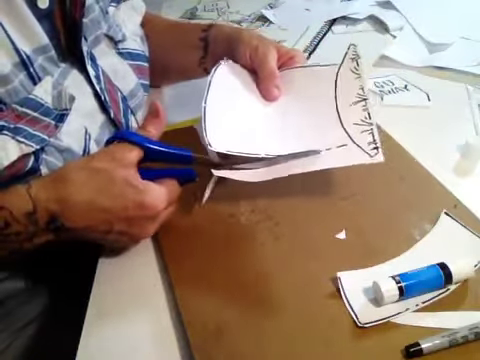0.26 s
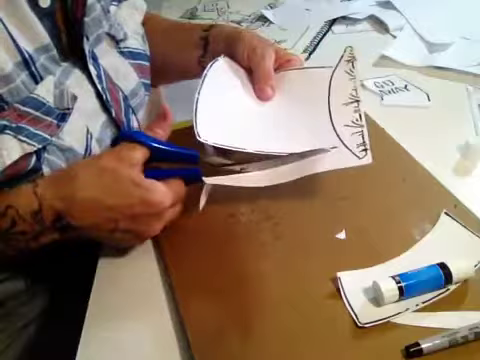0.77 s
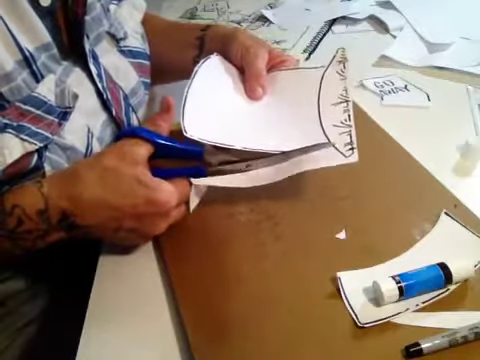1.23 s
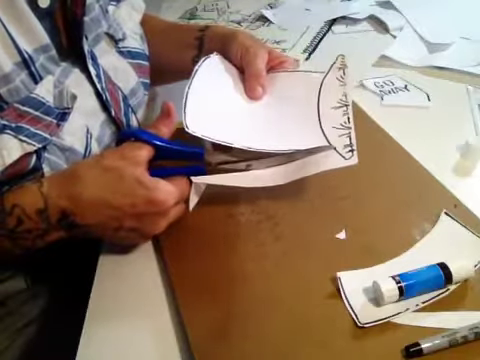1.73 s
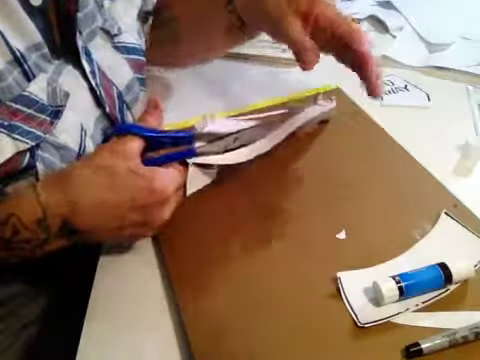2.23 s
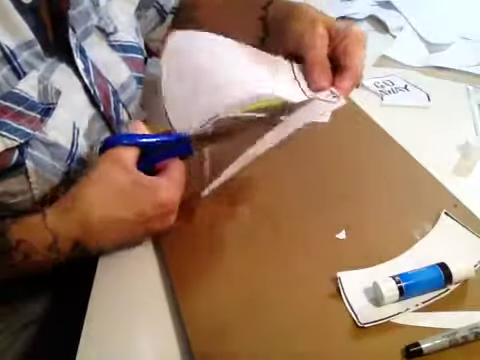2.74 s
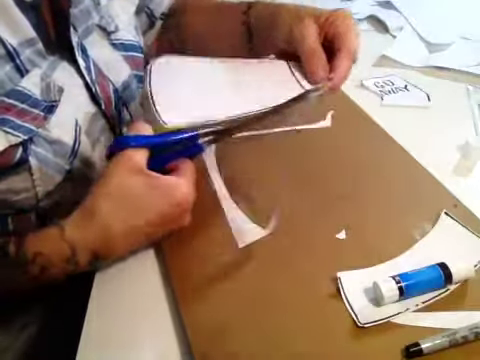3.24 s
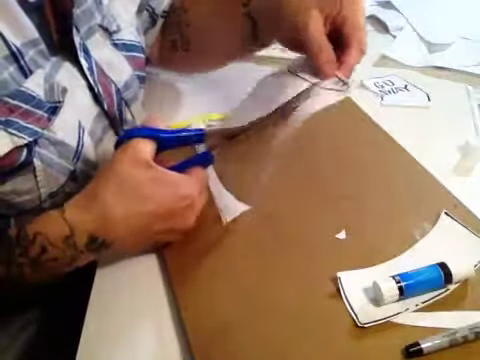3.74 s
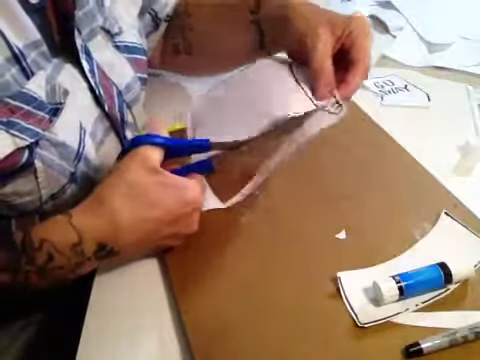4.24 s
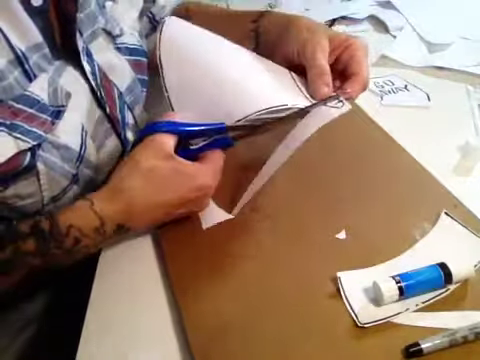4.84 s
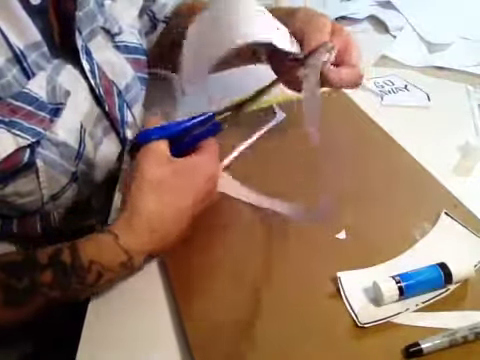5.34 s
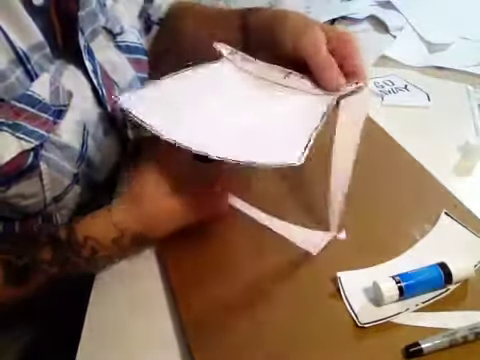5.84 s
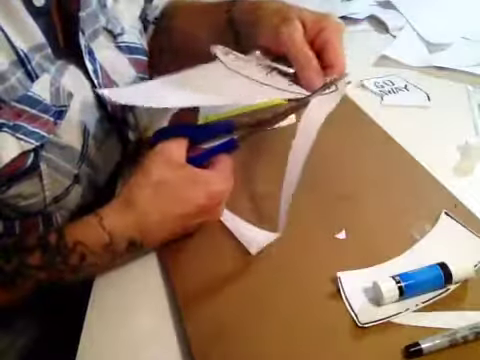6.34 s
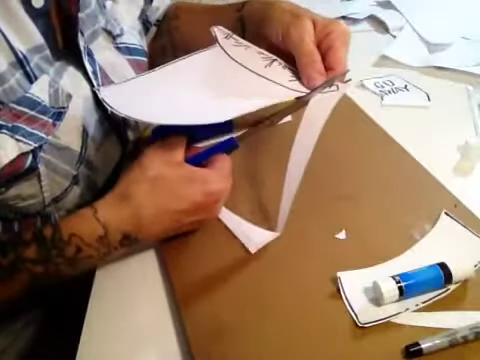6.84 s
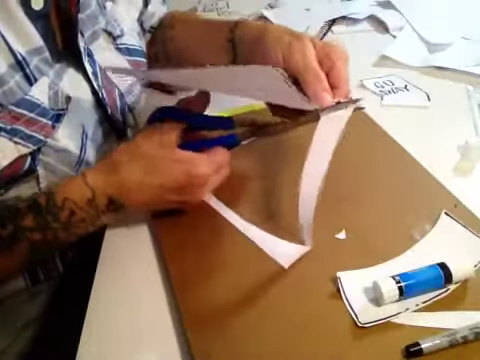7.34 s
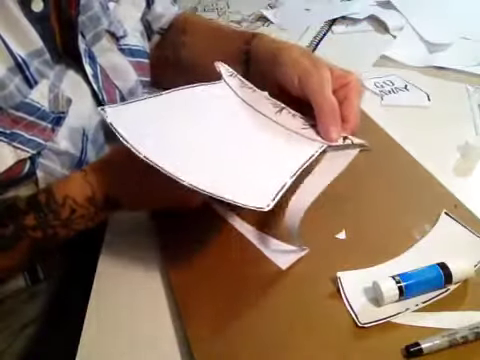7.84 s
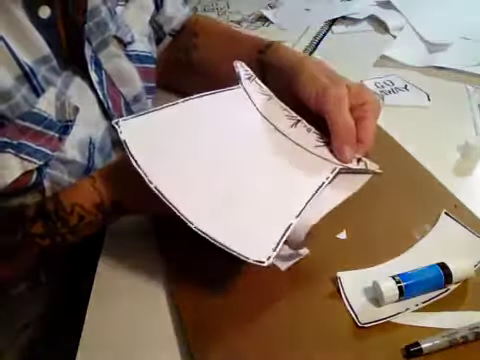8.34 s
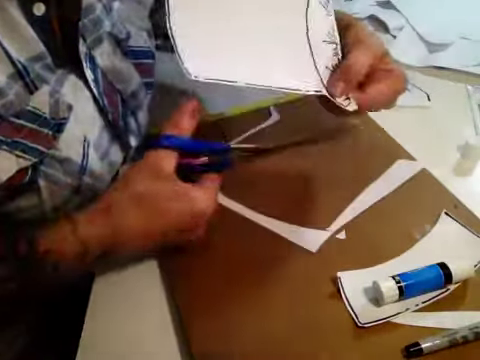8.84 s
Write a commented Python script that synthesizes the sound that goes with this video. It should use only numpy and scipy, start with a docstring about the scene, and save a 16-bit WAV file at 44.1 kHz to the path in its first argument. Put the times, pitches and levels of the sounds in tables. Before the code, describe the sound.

A close, small microphone indoors hears scissors working through stiff paper over a quiet low fan hum and soft hiss. From 0 to 2 seconds there are soft, uneven snips and rustles with tiny snaps, short gaps between them, and a faint steely ring around 1.6 to 1.9. At about 2.04 a single dull knock lands, followed by a swelling shear. Around 2.4 to 2.55 the sheet rattles and snaps sharply. From 2.7 to 4.5 softer, longer crackling strokes overlap; from 4.5 to 5.6 they grow stronger and brighter. Between 5.5 and 5.9 comes the fullest shearing and a loud papery rattle. It fades to near quiet by 6.4. Small ticks return at 6.7, thin scrapes and bright clicks cluster at 7.2 to 7.6, then light brushing builds from 8.1 to a crisp snap at 8.55. Quiet follows, with a last faint tick near 9.05. Echoes are short.

```python
"""A bright crackle of shearing fibres comes first: scissors work round a stiff sheet held close to a small microphone.
One rhythm of noise bursts, swelling with each stroke, drives the cut edge, the rustling sheet and faint blade tones.
Snaps are short noise cracks that ring a note of the sheet; one dull knock is a pulse and a low decaying sine.
A fan hums low in the room as narrow noise bands over hiss; sparse decaying echoes follow the close sounds."""
import sys
import numpy as np
from scipy import signal
from scipy.fft import rfft, irfft
from scipy.io import wavfile
from scipy.ndimage import uniform_filter1d

SR = 44100
rng = np.random.default_rng(int(sys.argv[2]) if len(sys.argv) > 2 else 0)


def boost(x):
    """Linear amplitude factor 10**(x/20) for a level x in decibels (scalar or array-like)."""
    u = np.asarray(x, float) / 20
    return 10 ** u


def to_wav(s):
    """Save 16-bit WAV."""
    ch = np.atleast_2d(s).T  # columns
    pcm = np.round(np.clip(ch, -1, 1) * 32767)  # PCM
    wavfile.write(sys.argv[1], SR, pcm.astype(np.int16))


N = 401310

# Snaps of the sheet: start_s, crack_db (peak drive before colouring), note_hz,
# note_db (rms over its first 10 ms), t60_s (decay of the burst)
SNAP_EVENTS = [(0.0646, -34, 2370, -54, 0.014), (0.1955, -41, 2120, -51, 0.015),
               (0.3234, -59, 1280, -53.5, 0.041), (0.691, -30.5, 2110, -65, 0.011),
               (0.8821, -35, 2440, -56, 0.0093), (1.0382, -32, 2230, -58, 0.011),
               (1.372, -33, 2160, -54, 0.008), (1.5706, -40, 2190, -58, 0.014),
               (2.0368, -31, 4300, -45, 0.0068), (2.4262, -34.5, 2060, -56, 0.022),
               (2.4428, -31, 3060, -58, 0.011), (2.464, -24.5, 2900, -37.5, 0.025),
               (2.4737, -32, 3230, -36, 0.022), (2.5224, -29, 1500, -38.5, 0.0055),
               (2.535, -39, 1170, -49, 0.03), (3.1778, -38, 1460, -53, 0.012),
               (3.2485, -39, 557, -52, 0.0081), (3.3484, -51.5, 550, -52, 0.012),
               (3.4998, -49, 557, -53, 0.02), (3.5323, -35.5, 3220, -54.5, 0.012),
               (3.737, -36, 2160, -54, 0.0091), (3.7661, -33, 2160, -45, 0.009),
               (3.779, -47, 1310, -50, 0.0092), (3.9672, -45, 1600, -61, 0.008),
               (4.0045, -38, 4120, -68, 0.0087), (4.2298, -39.5, 549, -66, 0.01),
               (4.3325, -40, 1360, -56, 0.012), (4.568, -33.5, 3460, -61, 0.01),
               (5.1796, -25, 2270, -48.5, 0.011), (5.2963, -34, 3900, -52, 0.018),
               (5.6549, -25.5, 4200, -45, 0.015), (5.7146, -30, 1400, -41.5, 0.015),
               (5.7155, -28, 3300, -40, 0.0088), (5.7885, -30, 3970, -51, 0.016),
               (5.8418, -42, 1850, -37.5, 0.011), (6.67, -46, 520, -68, 0.01),
               (6.7095, -55, 2070, -46.5, 0.02), (6.753, -37, 563, -60, 0.012),
               (7.011, -43, 1140, -56.5, 0.016), (7.208, -27, 3670, -56, 0.0066),
               (7.341, -32.5, 614, -61, 0.0083), (7.3812, -29.5, 2270, -57, 0.0098),
               (7.3948, -23, 3700, -54, 0.011), (7.408, -32, 4380, -63, 0.0071),
               (7.447, -26.5, 2310, -62, 0.01), (7.451, -41, 2300, -61, 0.014),
               (7.4715, -33, 1500, -73, 0.01), (7.5335, -22, 3950, -57, 0.0065),
               (7.587, -32, 4460, -54, 0.012), (7.5912, -27, 4180, -57, 0.011),
               (7.5964, -33, 3920, -62, 0.014), (7.7522, -40, 452, -70, 0.011),
               (7.9373, -45, 662, -78, 0.012), (7.9934, -35, 783, -72, 0.0078),
               (8.1307, -29.5, 3720, -52.5, 0.0098), (8.2328, -41, 3500, -54, 0.015),
               (8.2605, -37.5, 4420, -62, 0.015), (8.46, -38, 2510, -60, 0.012),
               (8.52, -34, 2580, -55, 0.0077), (8.535, -29, 3070, -47.5, 0.0097),
               (8.55, -14.5, 3700, -54, 0.0071), (9.0307, -34, 463, -62, 0.0065),
               (9.0451, -29, 4630, -49.5, 0.014), (9.0668, -36, 3730, -59, 0.012)]
# Colour of tearing fibres: frequency_hz, relative level_db (per Hz)
SHEAR_COLOUR = [(1200, -25), (2500, -3), (3800, 2.5), (6000, 3.5), (8500, 4.5), (10500, 5), (13000, 7),
                (15000, 5)]


def evened(x):
    """Scales to an rms of one."""
    return x / np.sqrt(np.mean(x ** 2) + 1e-20)


def read(points, hz):
    """Joins (Hz, value) points on a log frequency axis."""
    f, value = np.transpose(points)
    return np.interp(np.log(hz + 1), np.log(f + 1), value)


def curve(times_s, values):
    """Joins timed points into a straight-lined curve, one value per sample."""
    return np.interp(np.arange(N) / SR, times_s, values)


def add(mix, start_s, sound):
    """Mixes a sound in at a time."""
    part = mix[round(start_s * SR):][:len(sound)]
    part += sound[:len(part)]


def coloured(x, points):
    """Causal minimum-phase filter with the given spectrum that keeps the power of white noise."""
    level_db = read(points, abs(np.fft.fftfreq(8192, 1 / SR)))
    log_gain = np.log(boost(level_db))
    taps = np.fft.ifft(np.exp(np.conj(signal.hilbert(log_gain)))).real[:4096]
    return signal.oaconvolve(x, taps / np.linalg.norm(taps))[:N]


def resonate(x, hz, width_hz):
    """One decaying resonance that keeps the power of white noise."""
    t = np.arange(int(3 * SR / width_hz)) / SR
    taps = np.exp(-np.pi * width_hz * t) * np.sin(2 * np.pi * hz * t)
    return signal.oaconvolve(x, taps / np.linalg.norm(taps))[:N]


def gliding(x, hz, width_hz):
    """A resonance of gain one that follows a pitch curve: shift down, smooth, shift back."""
    turn = np.exp(2j * np.pi * np.cumsum(hz) / SR)
    r = np.exp(-np.pi * width_hz / SR)
    return 2 * (turn * signal.lfilter([1 - r], [1, -r], x / turn)).real


def strokes():
    """Overlapping strokes add their power; the balance of shear and rustle sets the bent sheet's pitch."""
    # Blade strokes and turns of the sheet: start_s, rise_s, fade_s, shear_db, rustle_db (drive at the top)
    stroke_events = [(0.0, 0.087, 0.024, -49, -50.5), (0.006, 0.01, 0.064, -51.5, -50.5),
                     (0.061, 0.077, 0.14, -50.5, -51.5), (0.184, 0.011, 0.021, -45.5, -45.5),
                     (0.286, 0.046, 0.014, -65, -53.5), (0.308, 0.07, 0.19, -48.5, -51.5),
                     (0.363, 0.11, 0.091, -56, -49), (0.673, 0.015, 0.19, -49.5, -46.5),
                     (0.715, 0.034, 0.087, -58, -51.5), (0.877, 0.004, 0.057, -54, -54),
                     (1.019, 0.015, 0.24, -50.5, -53.5), (1.068, 0.0025, 0.022, -44.5, -73.5),
                     (1.302, 0.077, 0.13, -52, -50), (1.318, 0.015, 0.05, -50, -55.5),
                     (1.365, 0.014, 0.018, -53, -48.5), (1.398, 0.011, 0.016, -45.5, -49.0),
                     (1.481, 0.0044, 0.044, -49.5, -53), (1.525, 0.014, 0.037, -52.0, -51),
                     (1.558, 0.013, 0.034, -49, -49), (1.634, 0.032, 0.031, -50, -52.5),
                     (1.657, 0.096, 0.052, -51.5, -55), (1.751, 0.013, 0.016, -54, -48),
                     (1.869, 0.088, 0.071, -53.5, -58.5), (1.992, 0.043, 0.051, -65, -51.5),
                     (2.026, 0.031, 0.18, -47.5, -51.5), (2.033, 0.004, 0.015, -59, -40.5),
                     (2.142, 0.12, 0.19, -46, -53.5), (2.415, 0.043, 0.12, -39, -47.5),
                     (2.42, 0.0051, 0.038, -45, -50.0), (2.454, 0.009, 0.044, -78.5, -33.5),
                     (2.489, 0.037, 0.035, -39, -39), (2.511, 0.005, 0.3, -54.0, -48.5),
                     (2.637, 0.048, 0.099, -52.0, -75.0), (2.743, 0.1, 0.22, -59.5, -56.5),
                     (2.852, 0.143, 0.095, -55.0, -59.5), (2.974, 0.25, 0.14, -53, -53.5),
                     (3.014, 0.047, 0.094, -54, -57.5), (3.199, 0.19, 0.45, -51.0, -60),
                     (3.302, 0.05, 0.056, -76.5, -47), (3.34, 0.17, 0.19, -53, -51.5),
                     (3.623, 0.021, 0.13, -49.5, -64), (3.625, 0.29, 0.054, -51.5, -55.0),
                     (3.704, 0.039, 0.16, -51, -52.5), (3.758, 0.0065, 0.074, -77.0, -45),
                     (3.901, 0.1, 0.052, -52.0, -60.0), (4.016, 0.045, 0.19, -48.5, -54.5),
                     (4.087, 0.28, 0.065, -50.0, -59.5), (4.32, 0.17, 0.1, -49, -54.0),
                     (4.325, 0.0082, 0.039, -55, -54.5), (4.34, 0.038, 0.05, -57.5, -52.0),
                     (4.517, 0.059, 0.075, -47, -56.5), (4.56, 0.19, 0.14, -43, -49.5),
                     (4.74, 0.11, 0.09, -44, -51.5), (4.9, 0.06, 0.18, -60.5, -61.5),
                     (4.973, 0.18, 0.21, -42, -51), (5.079, 0.037, 0.04, -40.0, -53),
                     (5.173, 0.005, 0.037, -46.5, -47.0), (5.269, 0.024, 0.28, -44.5, -52),
                     (5.294, 0.014, 0.022, -41.5, -47), (5.38, 0.076, 0.036, -46, -64.5),
                     (5.5, 0.039, 0.21, -46.5, -57.5), (5.508, 0.24, 0.038, -37, -50.0),
                     (5.641, 0.0099, 0.05, -46.0, -48.5), (5.686, 0.027, 0.039, -38, -40.5),
                     (5.745, 0.051, 0.238, -41.0, -49), (5.794, 0.16, 0.068, -52.0, -52.5),
                     (5.831, 0.01, 0.06, -40.5, -33), (5.97, 0.06, 0.14, -64, -60.0),
                     (6.085, 0.097, 0.26, -52.5, -60.5), (6.112, 0.31, 0.072, -54.5, -57.5),
                     (6.652, 0.019, 0.033, -65.0, -70), (6.705, 0.003, 0.059, -74, -56),
                     (6.748, 0.011, 0.025, -47, -53), (6.751, 0.002, 0.14, -59, -64),
                     (6.979, 0.064, 0.043, -45.5, -51.5), (7.06, 0.03, 0.067, -59, -66.0),
                     (7.125, 0.012, 0.2, -53.0, -61), (7.131, 0.62, 0.065, -59.5, -71.5),
                     (7.243, 0.17, 0.13, -48, -57), (7.442, 0.002, 0.02, -39, -65),
                     (7.528, 0.007, 0.058, -54, -71), (7.563, 0.021, 0.1, -47.5, -58.5),
                     (7.927, 0.01, 0.034, -57, -74), (7.974, 0.023, 0.11, -59.5, -75),
                     (8.105, 0.025, 0.046, -53.5, -67), (8.139, 0.054, 0.038, -56.5, -64),
                     (8.21, 0.026, 0.067, -53, -65.0), (8.293, 0.018, 0.043, -53, -61),
                     (8.362, 0.034, 0.059, -52, -67), (8.428, 0.13, 0.11, -45.5, -56),
                     (8.449, 0.016, 0.08, -50.5, -60.0), (8.522, 0.17, 0.13, -44.5, -51),
                     (9.011, 0.031, 0.013, -62, -61.5), (9.042, 0.002, 0.098, -55.5, -63.0)]
    held_db, quick_s = -7, 0.045
    power = np.full((2, N), 1e-10)
    for start_s, rise_s, fade_s, shear_db, rustle_db in stroke_events:
        t = np.arange(0, rise_s + 2 * fade_s, 1 / SR)
        swell = np.minimum(t / rise_s, 1) ** 2
        # Past the top it sinks ever faster, by 23 dB in its fade time.
        sink = boost(-23 * (np.maximum(t - rise_s, 0) / fade_s) ** 2)
        shape = swell * sink
        # A quick stroke is held back until a snap frees it.
        waits = [snap[0] - start_s for snap in SNAP_EVENTS]
        freed = [wait for wait in waits if 0 < wait < rise_s + 0.003 < quick_s]
        shape = np.where(t < max(freed, default=0), boost(held_db) * shape, shape)
        add(power[0], start_s, (boost(shear_db) * shape) ** 2)
        add(power[1], start_s, (boost(rustle_db) * shape) ** 2)
    shear_db, rustle_db = 10 * np.log10(power)
    # The tighter the sheet, the brighter it shears and the higher it rings: 0.12 octaves per dB.
    tight = 2 ** (0.12 * uniform_filter1d(shear_db - rustle_db, size=441))
    bend_hz = np.clip(1500 * tight, 700, 2900)
    return shear_db, rustle_db, bend_hz


def fibres(per_s, spread_db, smooth, clump_db):
    """Breaking fibres: tiny bursts of uneven size that come in clumps, over a smooth rub."""
    size = boost(spread_db * np.minimum(rng.exponential(1, N), 4))
    breaks = size * (rng.random(N) < per_s / SR)
    bursts = evened(signal.lfilter([1], [1, -np.exp(-1 / (0.00024 * SR))], breaks))  # 0.24 ms decay
    clumps = evened(signal.lfilter(np.hanning(500), 1, rng.standard_normal(N)))
    rhythm = evened((smooth + bursts) * boost(clump_db * clumps))
    return rhythm * rng.standard_normal((4, N))  # four parts share the rhythm, each with its own noise


def facing(x):
    """The top treble beams from the edge, the lower crackle from the loose sheet; both swing as it turns."""
    # The turning sheet: time_s, top_db (lift as the edge faces the microphone), full_db (loose paper's body)
    turning = [(0, 4.5, -0.5), (.8, -0.5, -0.5), (1.5, -3, -3), (2.2, 0.5, -1), (2.7, -5, 1.5),
               (3.402, -0.5, 0.5), (4.2, 0, -1), (5.2, -2, 1), (6.1, -1, 1), (6.8, 3, -2), (7.3, -1, -7),
               (7.8, 6.5, -6), (8.3, 4.5, 1), (9.1, 3.5, -1)]
    time_s, top_db, full_db = np.transpose(turning)
    for kind, hz, lift_db in (("high", 10500, top_db), ("low", 5000, full_db)):
        part = signal.filtfilt(*signal.butter(2, hz, kind, fs=SR), x)
        x = x + (boost(curve(time_s, lift_db)) - 1) * part
    return x


def cut_edge(at_edge, shear_db):
    """Shearing fibres radiate a bright crackle from the cut edge."""
    return facing(coloured(boost(shear_db) * at_edge, SHEAR_COLOUR))


def sheet(flat_drive, bend_drive, bend_hz):
    """The paper rustles as a broad flat surface and through one wide resonance that moves as it bends."""
    # Colour of the rustling paper: frequency_hz, relative level_db (per Hz)
    sheet_colour = [(150, -18.5), (350, -4), (700, 2.5), (980, -4.5), (1180, 2.5), (1400, 0.5), (2200, -2),
                    (3300, -1.5), (5000, -6), (9000, -15)]
    flat = 0.67 * coloured(flat_drive, sheet_colour)
    bent = 0.69 * gliding(coloured(bend_drive, sheet_colour), bend_hz, width_hz=1750)
    return flat + bent


def blades(drive):
    """Steel resonances ring under the fibres and drift with the point of contact."""
    # Blade resonances: pitch_hz, width_hz, relative level_db
    blade_modes = [(1193, 53, -11), (2173, 220, 1), (2750, 150, -9.5), (3670, 98, -16), (7900, 500, -7),
                   (10700, 300, -21), (13700, 830, -3)]
    wander = evened(signal.oaconvolve(rng.standard_normal(N), np.hanning(6000), "same"))
    drift = 1 + 0.02 * wander
    steel = np.zeros(N)
    for hz, width_hz, level_db in blade_modes:
        even_width = np.sqrt(SR / (2 * np.pi * width_hz))  # narrow and wide modes pass like power
        steel += boost(level_db) * even_width * gliding(drive, hz * drift, width_hz)
    return steel


def creased(x, patchy_db):
    """As the paper bends, patches of its spectrum swell and fade at random."""
    z = signal.stft(x, nperseg=512, noverlap=384)[2]
    patches = rng.standard_normal(z.shape[::-1]).T
    patches = uniform_filter1d(patches, size=14, axis=0)  # spread over frequency
    patches = evened(uniform_filter1d(patches, size=12, axis=1))  # and over time
    return signal.istft(z * boost(patchy_db * patches), nperseg=512, noverlap=384)[1][:N]


def cutting():
    """The same rhythm of breaking fibres drives the cut edge, the sheet and the blades."""
    # How much the blades ring: time_s, bite_db (drive against the rustle)
    blade_bite = [(0, 4), (.3, -3), (.5, -7), (.66, -3), (.75, 5.5), (.9, 3), (1.1, -3.5), (1.4, 1),
                  (1.6, 8), (1.8, 16), (2.0, -12), (9.1, -9.5)]
    shear_db, rustle_db, bend_hz = strokes()
    at_edge, in_sheet, in_bend, in_steel = fibres(per_s=1100, spread_db=3.5, smooth=5.2, clump_db=1.45)
    bite = boost(curve(*np.transpose(blade_bite)))
    free = boost(rustle_db) / np.sqrt(1 + bite ** 2)  # gripped by the blades, the sheet rustles less
    paper = cut_edge(at_edge, shear_db) + sheet(free * in_sheet, free * in_bend, bend_hz)
    near = creased(paper, patchy_db=1.85) + snaps() + blades(free * bite * in_steel)
    return signal.lfilter(*signal.butter(2, 260, "high", fs=SR), near)  # small things radiate no bass


def background():
    """Rumble and hiss as coloured noise, with the narrow wavering bands of a fan."""
    # Fan bands: pitch_hz, width_hz, level_db (rms)
    fan_bands = [(181.6, 6.8, -61.5), (216.1, 4, -63.5), (299.3, 14, -69.5)]
    # Colour of rumble and hiss: frequency_hz, relative level_db (per Hz)
    air_colour = [(60, -42), (100, -27.5), (150, -14.5), (260, -10), (400, -15.5), (700, -22.5),
                  (1300, -29), (3000, -32), (7000, -31.5), (12000, -33.5), (15000, -32)]
    hum = np.zeros(N)
    for hz, width_hz, level_db in fan_bands:
        hum += boost(level_db) * evened(resonate(rng.standard_normal(N), hz, width_hz))
    return hum + boost(-60) * coloured(rng.standard_normal(N), air_colour)


def room(x):
    """Sparse echoes of random sign, each frequency band dying at its own speed."""
    # Decay of the room: frequency_hz, t60_s
    room_decay = [(300, .2), (1500, .16), (6000, .12), (14000, .09)]
    taps = np.zeros(SR // 2)
    slots = np.arange(120, len(taps) - 20, 20)  # one echo at random in every 20 samples
    taps[slots + rng.integers(0, 20, len(slots))] = rng.choice([-1., 1.], len(slots))
    hz, t, z = signal.stft(taps, SR, nperseg=256)
    decay = boost(-60 * t / read(room_decay, hz)[:, None])
    tail = signal.istft(z * decay, SR, nperseg=256)[1]
    return signal.oaconvolve(x, tail / np.linalg.norm(tail))[:N]


def snaps():
    """Each snap is a bright crack that dies fast and a few cycles of the sheet's note."""
    cracks, notes, t = np.zeros(N), np.zeros(N), np.arange(2000) / SR
    jolts = rng.standard_normal((len(SNAP_EVENTS), len(t)))
    for (start_s, crack_db, hz, note_db, t60_s), jolt in zip(SNAP_EVENTS, jolts):
        onset = 1 - np.exp(-t / 0.00017)
        burst = np.tanh(2 * jolt) * onset * boost(-60 * t / max(t60_s, 0.003))
        tones = np.sin(2 * np.pi * hz * t) + 0.4 * np.sin(2 * np.pi * 1.8 * hz * t)  # note and overtone
        ring = np.exp(-np.pi * (200 + 0.15 * hz) * t) * tones  # higher notes are damped faster
        note = signal.fftconvolve(burst, ring)[:len(t)]
        add(cracks, start_s, boost(crack_db) * burst)
        add(notes, start_s, boost(note_db) * note / note[:SR // 100].std())
    return coloured(cracks, SHEAR_COLOUR) + notes


def knock():
    """One blunt knock: a sharp short push, and barely two cycles of a low ring."""
    start_s, tick_db, tick_s = 2.0368, -22.5, 0.00014
    ring_db, ring_hz, ring_t60_s = -20.5, 470, 0.012
    t, out = np.arange(2000) / SR, np.zeros(N)
    tick = boost(tick_db) * np.e * t / tick_s * np.exp(-t / tick_s)
    ring = boost(ring_db - 60 * t / ring_t60_s) * np.sin(2 * np.pi * ring_hz * t)
    add(out, start_s, tick - ring)
    return out


def scene():
    """Scissors and paper, their echo 10 dB down, and the room's own sound."""
    near = cutting() + knock()
    return (near + boost(-10) * room(near) + background())[None]


def top_cut(x):
    """Nothing passes above the cut-off."""
    return signal.sosfilt(signal.butter(12, 16340, fs=SR, output="sos"), x)


def record(dry):
    """Limits the band: little deep bass is left, and the treble is cut steeply above 15 kHz."""
    # Band limit of the finished mix: frequency_hz, gain_db
    band_limit = [(25, -22), (45, -20), (80, 0), (14950, 0), (15150, -40)]
    hz = np.fft.rfftfreq(N, 1 / SR)
    mix = irfft(rfft(dry) * boost(read(band_limit, hz)), N)
    return top_cut(mix)


dry = scene()
out = record(dry)
to_wav(out)
```